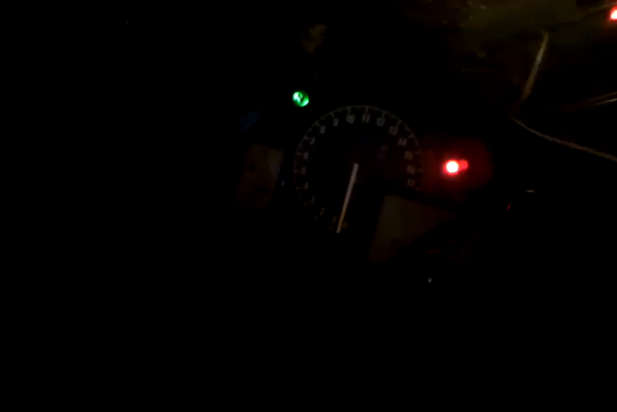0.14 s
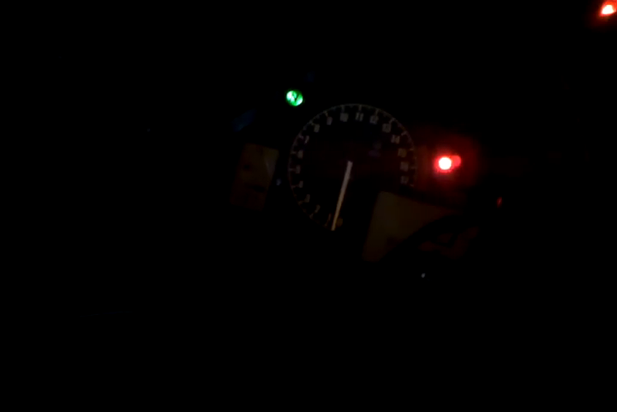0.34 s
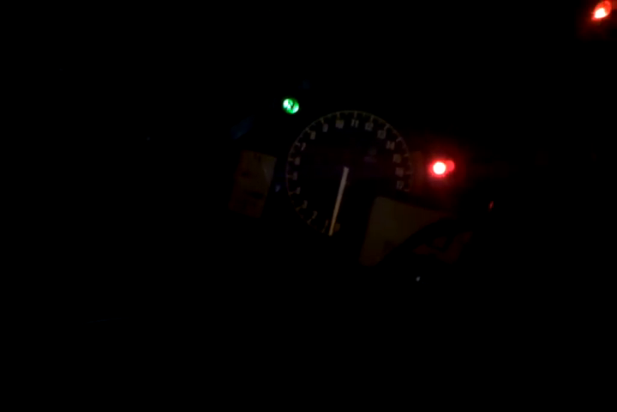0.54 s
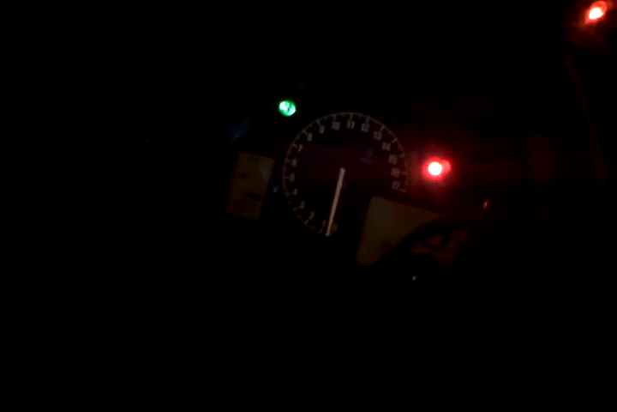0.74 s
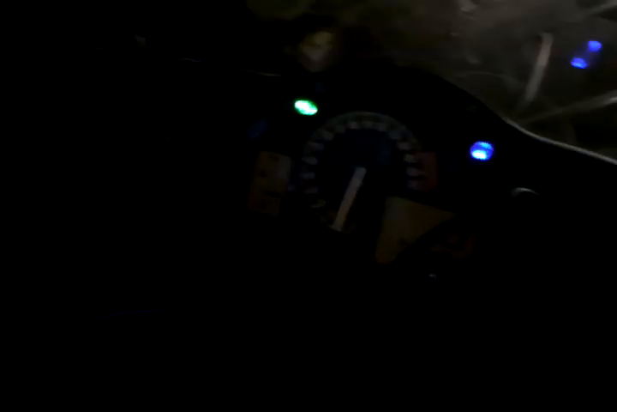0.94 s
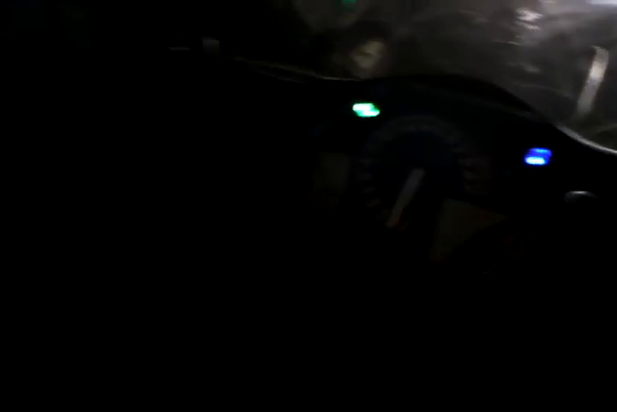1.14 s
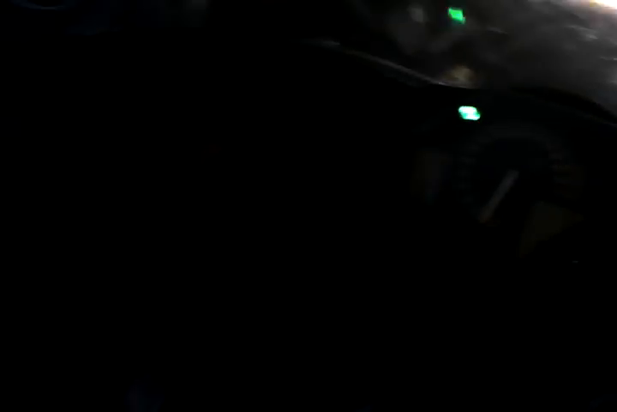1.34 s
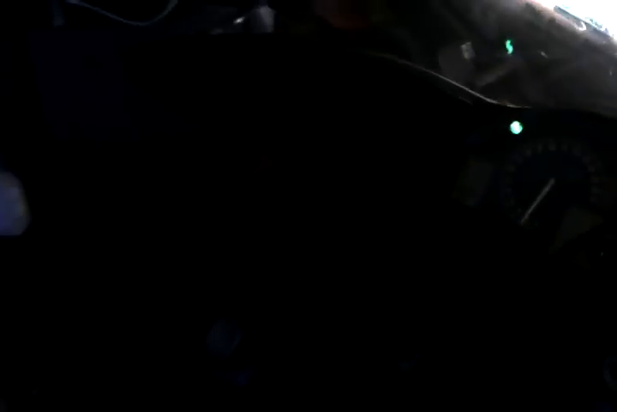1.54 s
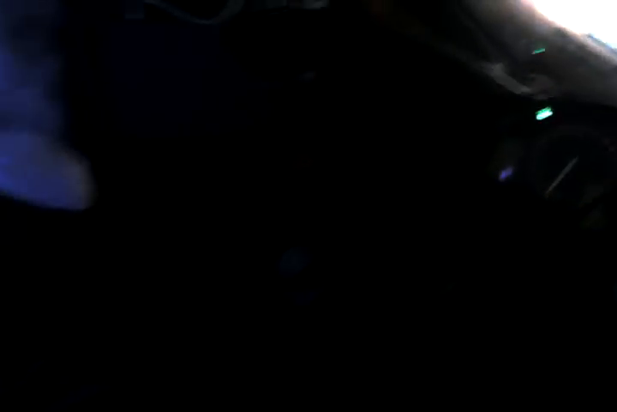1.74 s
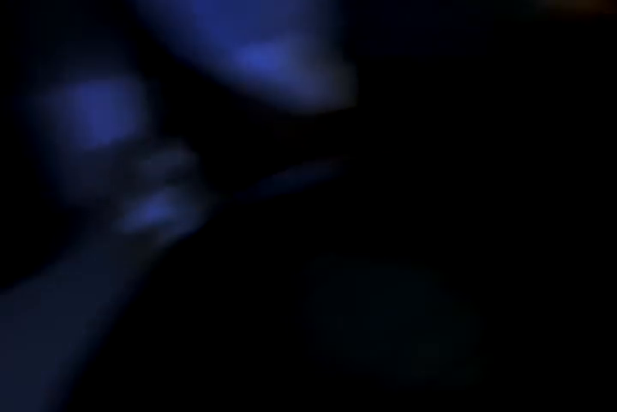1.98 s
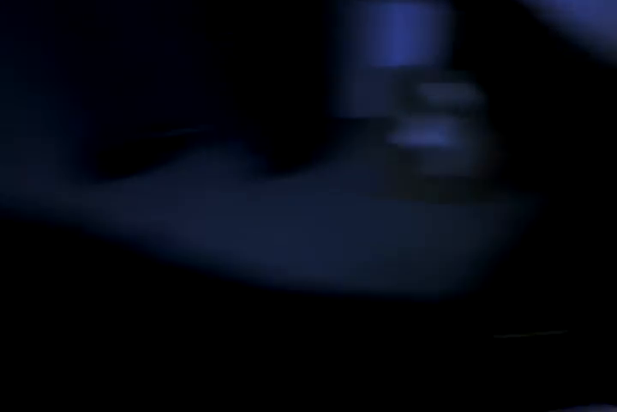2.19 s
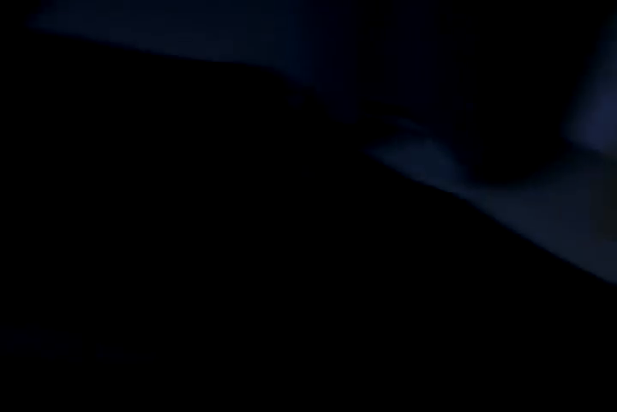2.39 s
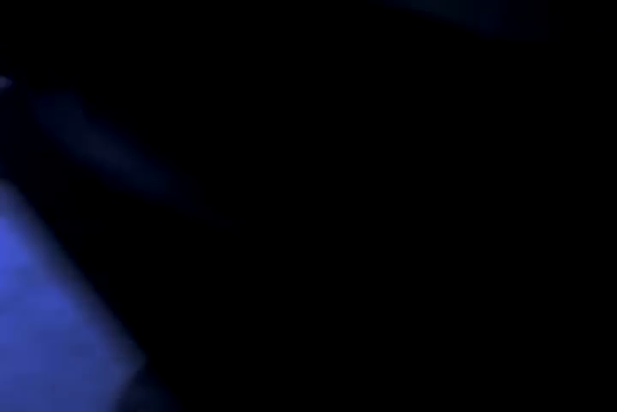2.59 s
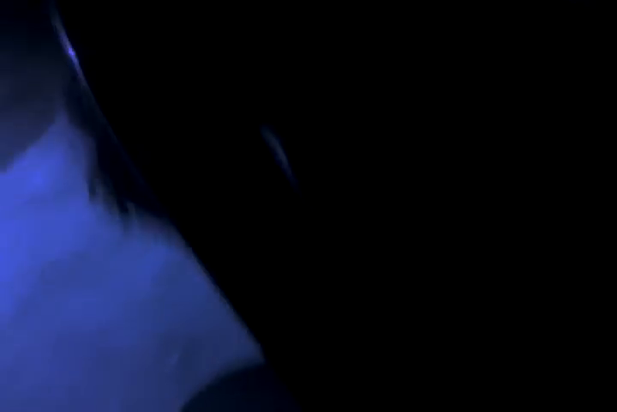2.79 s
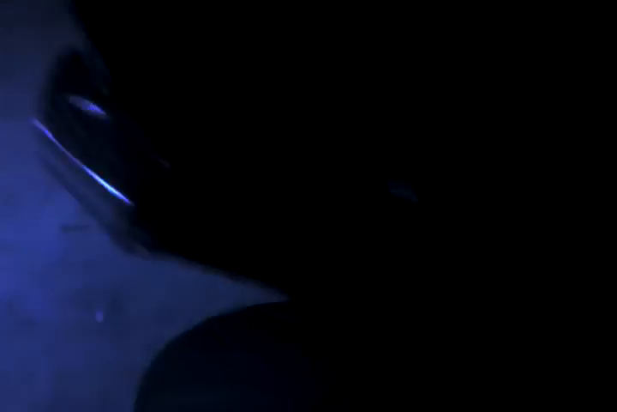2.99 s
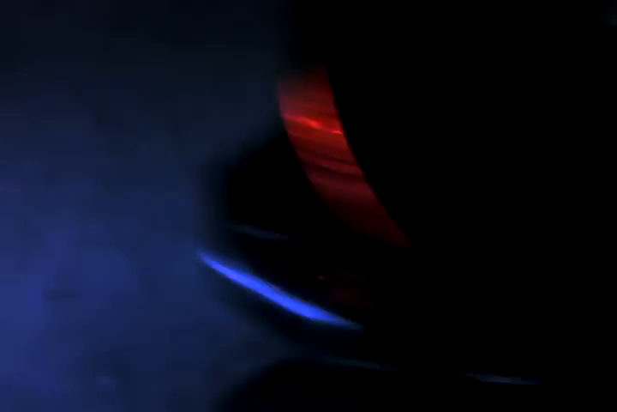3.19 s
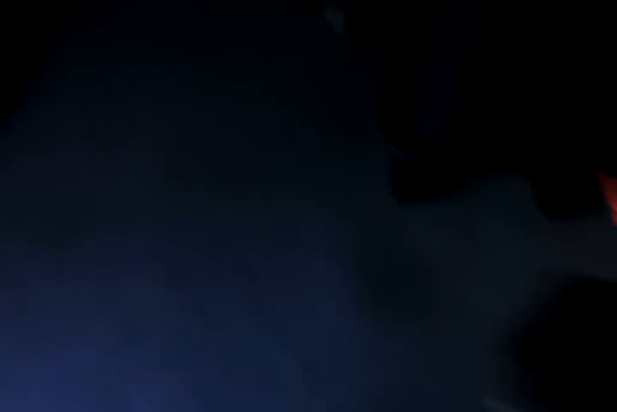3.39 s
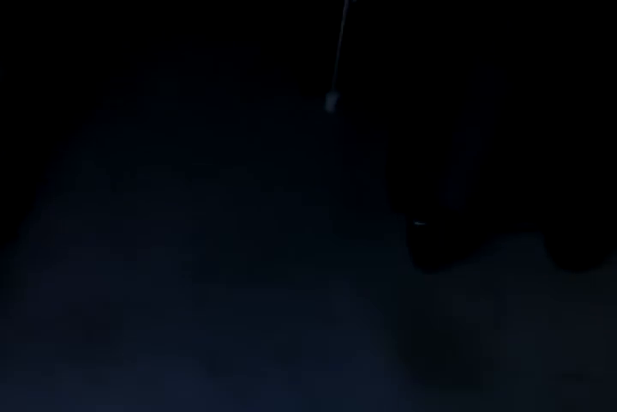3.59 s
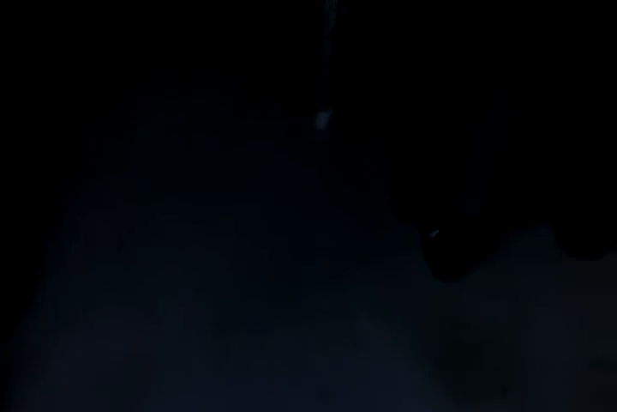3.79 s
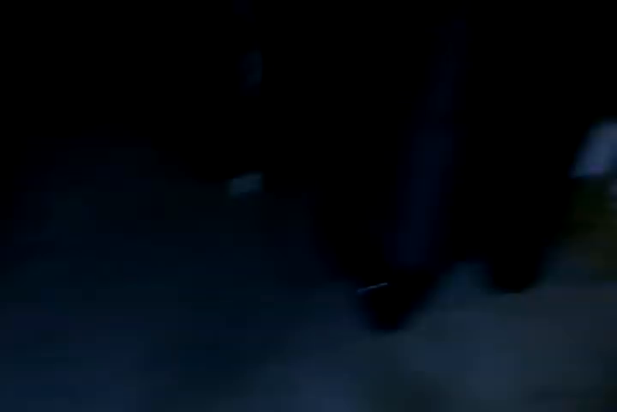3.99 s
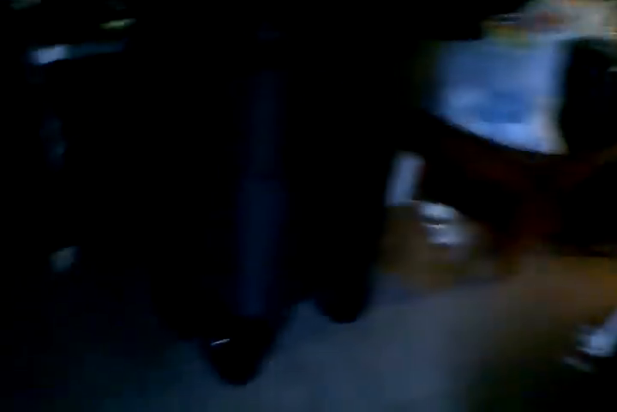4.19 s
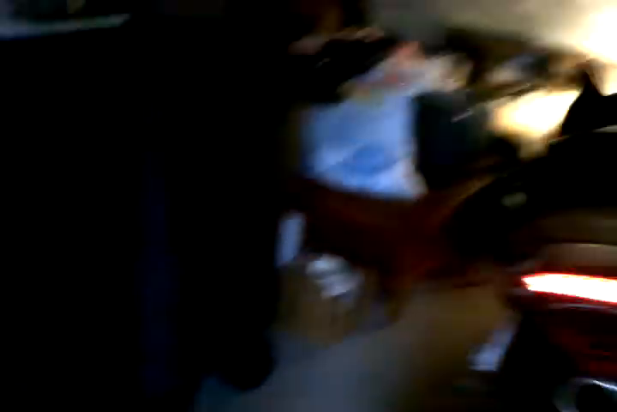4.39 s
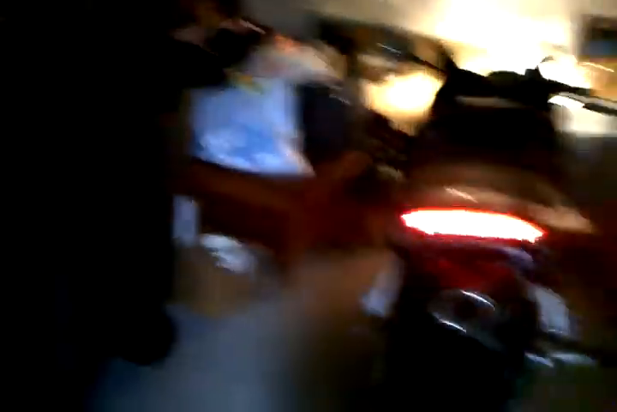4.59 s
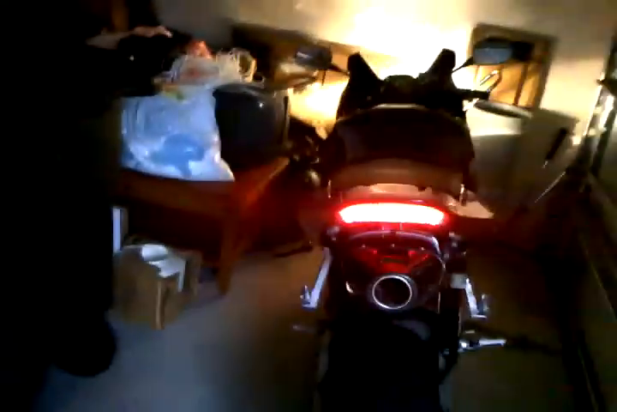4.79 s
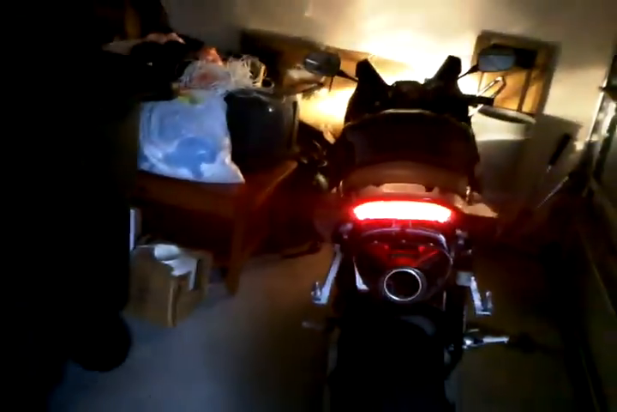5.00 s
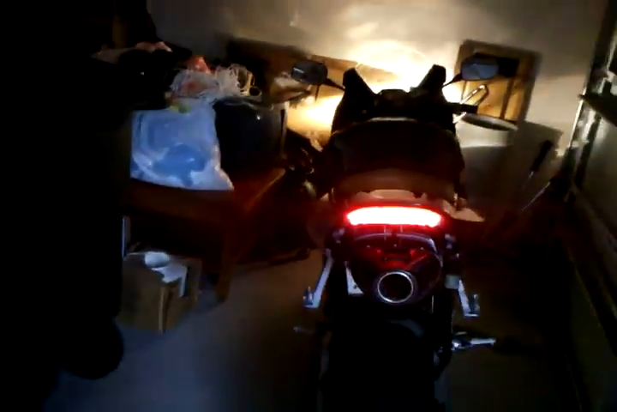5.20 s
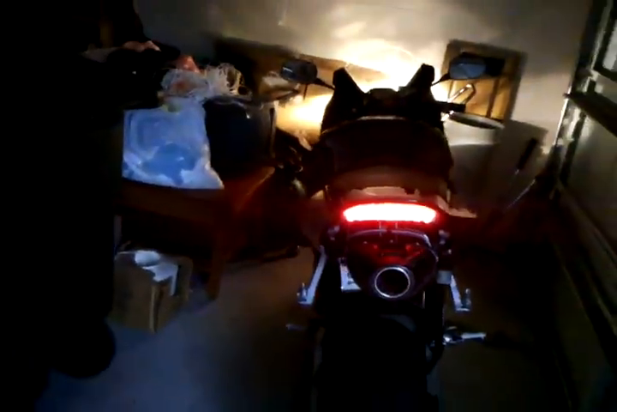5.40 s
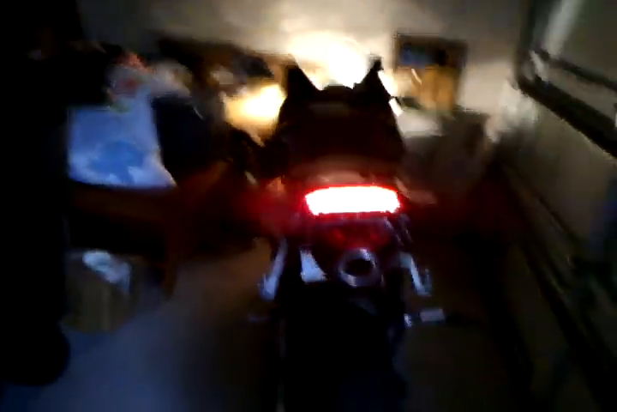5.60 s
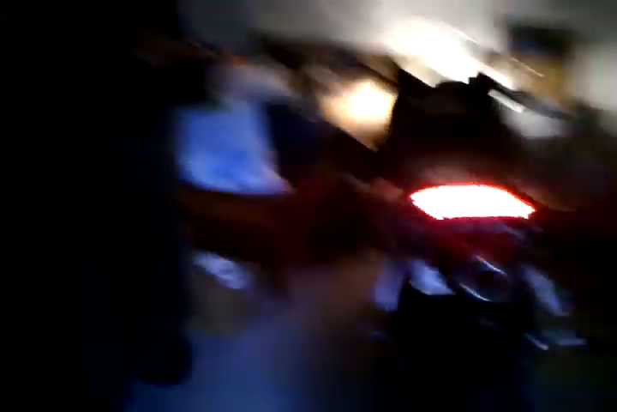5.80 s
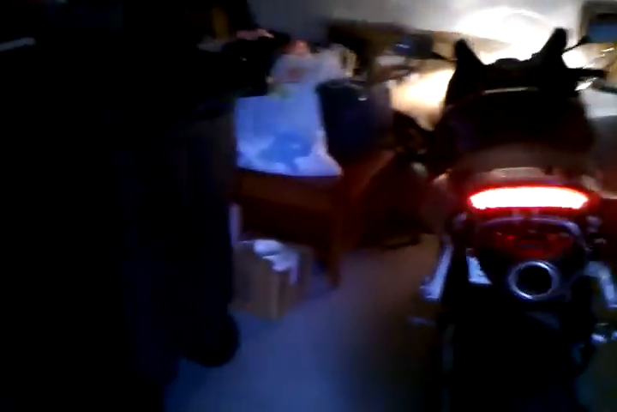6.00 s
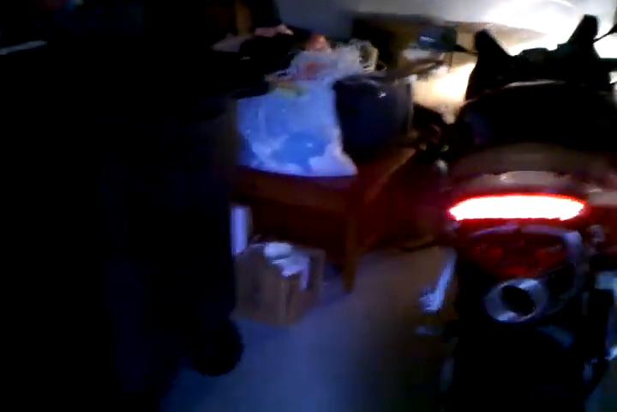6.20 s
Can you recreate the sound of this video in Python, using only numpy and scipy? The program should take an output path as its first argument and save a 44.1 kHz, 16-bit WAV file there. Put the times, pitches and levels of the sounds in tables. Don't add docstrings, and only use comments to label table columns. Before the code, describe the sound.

In a quiet garage a motorcycle's starter whines and labours, the engine catches and settles into a lumpy idle, booming loudest near the tailpipe.

```python
import sys
import numpy as np
from scipy import signal
from scipy.fft import rfft, irfft, next_fast_len
from scipy.io import wavfile
from scipy.ndimage import uniform_filter1d

SR = 44100
rng = np.random.default_rng(int(sys.argv[2]) if len(sys.argv) > 2 else 0)


def unload_audio(sound):
    columns = np.transpose(np.atleast_2d(sound))
    steps = np.round(np.clip(columns, -1, 1) * 32767)
    wavfile.write(sys.argv[1], SR, steps.astype(np.int16))


def amplitude_ratio(level_db):
    exponent = np.asarray(level_db, float) / 20
    return 10 ** exponent


N = 275625
ENGAGE_S = .3212
BLAST_LAG_S = .0062


def rms_one(x):
    return x / np.sqrt(np.mean(x ** 2) + 1e-20)


def in_time(rows):
    s, *columns = np.transpose(rows)
    return [np.interp(np.arange(N) / SR, s, c) for c in columns]


def drift(rate_hz):
    r = np.exp(-2 * np.pi * rate_hz / SR)
    wander = signal.lfilter([1], [1, -2 * r, r * r], rng.standard_normal(N + SR))
    return rms_one(wander[SR:])


def resonance(x, hz, width_hz):
    r = np.exp(-np.pi * width_hz / SR)
    return signal.lfilter([1 - r, 0, r - 1], [1, -2 * r * np.cos(2 * np.pi * hz / SR), r * r], x + 1e-18)


def noise_bands(spectrum, patchy_db, size=N):
    hz, level_db = np.transpose(spectrum)
    count = round(3 * np.log2(hz[-2] / hz[1]))
    edges = np.geomspace(hz[1], hz[-2], count + 1)
    centres = np.sqrt(edges[1:] * edges[:-1])
    white = rng.standard_normal((2, size))
    flicker = amplitude_ratio(patchy_db * drift(3.4))
    bands = np.zeros((len(centres), N))
    for k, centre in enumerate(centres):
        sos = signal.butter(2, edges[k:k + 2], "band", fs=SR, output="sos")
        band = signal.sosfilt(sos, white[k % 2])
        level = amplitude_ratio(np.interp(np.log(centre), np.log(hz), level_db))
        bands[k, :size] = level * np.roll(flicker, 19973 * k)[:size] * band
    return centres, bands / np.std(bands.sum(axis=0)[:size])


# f/Hz, width/Hz, level/dB
PUMP_TONES = [(1280, 40, -68.5), (1730, 65, -73)]


def fuel_pump():
    return sum(amplitude_ratio(db) * rms_one(resonance(rng.standard_normal(N), hz, width))
               for hz, width, db in PUMP_TONES)


# f/Hz, level/dB
QUIET_TONE = [(56, -29), (95, 1), (1090, -16), (1310, -7), (2260, -19), (6630, -14), (7400, -25),
              (9620, -55), (16300, -120)]


def quiet_garage():
    return amplitude_ratio(-58) * noise_bands(QUIET_TONE, patchy_db=-2.0, size=SR)[1].sum(axis=0)


# t/s, level/dB (peak)
SWITCH_TICKS = [
    (.205, -51),
    (0.307, -29),
    (.312, -27),
]


def switch():
    clicks = np.zeros(N)
    for s, db in SWITCH_TICKS:
        clicks[round(s * SR)] = amplitude_ratio(db + 12.5)
    return resonance(clicks, 2300, 900) - resonance(clicks, 3900, 800) + resonance(clicks, 5300, 980)


# t/s, f/Hz (gear teeth meeting), level/dB
STARTER_SPEED = [
    (.36, 1500, -27),
    (.4, 1760, -25),
    (.46, 1790, -25),
    (.495, 1620, -25),
    (.53, 1300, -30),
    (.59, 1160, -28),
    (.64, 1290, -25),
    (.75, 1325, -24.5),
    (.93, 1320, -24),
]
# t/s, half length/s, swell level/dB, pitch sag/0-1
COMPRESSIONS = [
    (0.468, 0.018, 1.5, 0),
    (0.585, 0.039, 8, 0.07),
    (0.673, 0.028, 7.5, 0.05),
    (0.749, 0.031, 8.5, 0.03),
    (0.833, .035, 7, .035),
]
# t/s, blur/0-1
GEAR_BLUR = [
    (.36, .85),
    (.46, .78),
    (.5, .92),
    (.62, .9),
    (.66, .72),
    (.93, .72),
]
# multiple, level running light/dB, level loaded/dB
TOOTH_TONES = [(.5, -3, -26), (1, 3.5, -7.5), (1.5, -2, -22), (2, -1, -3), (2.5, -5.5, -12.5),
               (3, -5.5, -7.5), (4, -15, -5.5), (5, -18, -10)]
# f/Hz, level/dB (per Hz)
GRIND_TONE = [(240, -47), (400, -16), (688, -1), (1050, -10.5), (1350, -0.5), (1550, -5), (2600, -4),
              (6640, -5.5), (7600, 9), (9880, -42), (16700, -120)]


def starter():
    mesh_hz, effort_db = in_time(STARTER_SPEED)
    t, blur = np.arange(N) / SR, in_time(GEAR_BLUR)[0]
    load_db, sag = np.zeros(N), np.zeros(N)
    for s, half, swell_db, share in COMPRESSIONS:
        near = np.clip((t - s) / half, -1.5, 1.5)
        load_db += swell_db * np.exp(-near ** 4) * (abs(near) < 1.5)
        sag += share * np.sin(near * np.pi / 1.5)
    turn = 2 * np.pi * np.cumsum(mesh_hz * (1 - sag)) / SR
    loaded = np.clip((t - 0.562) / 0.1 + .5, 0, 1)
    whine = np.zeros(N)
    for k, light_db, loaded_db in TOOTH_TONES:
        db = effort_db + light_db + (loaded_db - light_db) * loaded
        wobble = drift(50 + 50 * k) * np.sin(k * turn) + drift(50 + 50 * k) * np.cos(k * turn)
        whine += amplitude_ratio(db) * (np.sqrt(2 - 2 * blur) * np.sin(k * turn) + np.sqrt(blur) * wobble)
    whine *= np.clip((t - .35) / 0.11, 0, 1)
    clash = amplitude_ratio(-36.5) * np.exp(-np.maximum(t - ENGAGE_S, 0) / 0.023)
    grind = amplitude_ratio(effort_db + 0.5) * amplitude_ratio(.7 * load_db) + clash
    grit = noise_bands(GRIND_TONE, patchy_db=0.0, size=SR)[1].sum(axis=0)
    sound = whine * amplitude_ratio(load_db - 1) + grind * grit
    return sound * (t > ENGAGE_S) * np.clip((.94 - t) / 0.079, 0, 1)


# t/s, level/dB
PUFFS = [
    (.32, -38.5),
    (.37, -34),
    (.5, -47),
    (.6, -33),
    (.8, -37),
    (.92, -27.5),
    (1.0, -42.5),
]


def cranking_puffs():
    t = np.arange(N) / SR
    low = resonance(rng.standard_normal(N), 190, 76)
    high = resonance(rng.standard_normal(N), 280, 120)
    return amplitude_ratio(in_time(PUFFS)[0]) * (t > ENGAGE_S) * rms_one(low + 0.17 * high)


# t/s, firings/s
IDLE_SPEED = [
    (.8, 35.5),
    (1.35, 35.3),
    (1.5, 38.5),
    (2.2, 39),
    (6.3, 39.6),
]
# t/s, level change of that blow/dB, of the next blow/dB,
# sag of speed after it/0-1
STUMBLES = [(.817, -7, -8, 0), (0.959, -8.5, 3, 0), (1.157, -19.5, -9.5, .03), (1.299, -6.5, 2, 0.01),
            (1.566, -7.5, 6.5, 0.04), (1.774, -11.5, -4.5, .05), (1.975, 4, -4.5, 0.05), (2.185, -5, -7, 0),
            (2.412, -5.7, 1.5, 0.05), (2.514, 0, -2.5, 0.05), (2.615, -6, -2, .05), (2.741, -2, -0.5, 0.03),
            (3.069, -8.5, 0, 0), (3.131, -2, 0.5, .12), (3.297, -15.5, 0.5, .05),
            (3.474, -11.5, -1.5, .045), (3.677, 0, -2, .05), (3.883, -9, -2, 0.06),
            (4.085, -12, -22.5, .07), (4.286, -20, -21, 0), (4.359, -8.7, -1, 0.07),
            (4.484, -4.5, -1, 0.01), (4.687, 1, -0.5, 0.05), (4.885, -4, -0.5, 0.05), (5.118, -2, -3, 0.07),
            (5.324, -4, -0.5, .05), (5.523, -1.5, -2, 0.02), (5.721, -5.5, -2.5, .05),
            (5.902, -4.5, 1, 0.03), (6.122, -5, 0, .05)]


def crank():
    s, *_, sag = np.transpose(STUMBLES)
    s = np.append(s - BLAST_LAG_S, s[-1] + .195)
    idling = np.diff(s) * np.interp(s[1:] - np.diff(s) / 2, *np.transpose(IDLE_SPEED))
    counts = np.round(idling)
    laps = np.interp(np.arange(N) / SR, s, np.arange(len(s)))
    lap = laps.astype(int)
    sag = sag[lap]
    slowest = .22
    angle = 2 * np.pi * (laps - lap - slowest)
    share = laps - lap - sag / (2 * np.pi) * (np.sin(angle) + np.sin(2 * np.pi * slowest))
    fired = (np.cumsum(counts) - counts)[lap] + counts[lap] * share
    fast = 100 * ((counts / idling)[lap] * (1 - sag * np.cos(angle)) - 1)
    return np.where(laps > 0, fired, -.5), fast


def blast(blows, peak_db):
    blast_hz, length_s, lean_rad = 225, .0015, .3
    t = np.arange(2 * round(BLAST_LAG_S * SR)) / SR - BLAST_LAG_S
    shape = -np.cos(2 * np.pi * blast_hz * t - lean_rad) * np.exp(-.5 * (t / length_s) ** 2)
    return amplitude_ratio(peak_db) * signal.fftconvolve(blows, shape)[:N]


# t/s, roughness/0-1
ROUGHNESS = [
    (.8, .6),
    (1.4, .5),
    (2.1, .3),
    (2.25, .06),
    (3.2, .07),
    (6.25, .07),
]
CYLINDERS_DB = [-2.1, -0.43, 0.082, -0.14]
# t/s, exhaust level/dB, place in the garage boom/-1..1, tailpipe blow peak level/dB
WALK = [(.75, -65, 0.94, -14), (.93, -29, -0.067, -33), (1.02, -22, 0.099, -22), (1.5, -26, -0.16, -15.5),
        (2.1, -20.5, 0, -20), (2.3, -17, 0.29, -16), (2.6, -19, 0.39, -10), (2.9, -18.5, 0.69, -11.5),
        (3.1, -14.5, -0.067, -18), (3.2, -17, .2, -4), (3.6, -14, 0.2, -2), (3.9, -16, 0.11, -3),
        (4.1, -21, 0, -4.5), (4.4, -21, 0.045, -4.5), (4.65, -20.5, 0.12, -8.5), (5.0, -21, -0.024, -10.5),
        (5.6, -23, -0.19, -13), (6.25, -21, -0.11, -13.5)]
# f/Hz, width/Hz, level/dB
PIPE_MODES = [
    [(82.4, 88, -34.5), (120, 87, 4.5)],
    [(148.8, 61, 12.5)],
    [(195.5, 37, 2), (224.7, 88, 6.5), (243.6, 32, 4)],
    [(256, 160, 5), (322, 58, 13), (413, 250, -31.5)],
]
# offset level/dB, dB per unit of boom, dB per 1% of speed
PIPE_LAW = [(-18, -12.5, 0.5), (0.5, 12, 0.23), (2, -11, 0.68), (-16, 3, 4)]


def exhaust(fired, fast):
    at = np.flatnonzero(np.diff(np.floor(fired)))
    rough, chance = in_time(ROUGHNESS)[0], rng.standard_normal((len(at) + 1, 2))[1:]
    strength_db = np.resize(CYLINDERS_DB, len(at)) + 3.5 * rough[at] * chance[:, 0]
    for s, first_db, next_db, _ in STUMBLES:
        k = np.argmin(abs(at - (s - BLAST_LAG_S) * SR))
        strength_db[k:k + 2] += first_db, next_db
    blows = np.zeros(N)
    late = (.002 * SR * rough[at] * chance[:, 1]).astype(int)
    blows[np.clip(at + late, 0, N - 1)] = amplitude_ratio(strength_db)
    gust = signal.lfilter([1], [1, -np.exp(-1 / (0.068 * SR))], blows)
    drive = blows + .05 * rough * gust * rng.standard_normal(N)
    level_db, boom, blast_db = in_time(WALK)
    lag = round(0.01286 * SR)
    drive[lag:] += amplitude_ratio(-7 + 5 * boom[lag:]) * drive[:-lag].copy()
    muffler = signal.butter(4, [80, 370], "band", fs=SR, output="sos")
    drive = signal.sosfilt(muffler, drive)
    out = blast(blows, blast_db)
    limit = 2.6
    fast = limit * np.tanh(uniform_filter1d(fast, size=SR // 30) / limit)
    for modes, (offset_db, boom_db, speed_db) in zip(PIPE_MODES, PIPE_LAW):
        ring = sum(amplitude_ratio(db) * rms_one(resonance(resonance(drive, hz, width), hz, width))
                   for hz, width, db in modes)
        gain = amplitude_ratio(level_db + offset_db + boom_db * boom + speed_db * fast)
        out -= gain * ring / np.sqrt(abs(uniform_filter1d(ring ** 2, size=SR // 4)) + .01)
    return out


# t/s, level/dB, turned away from the engine/-.3..1
CLATTER_LEVEL = [(.9, -33, -.3), (.96, -30, 0), (1.94, -33, 0.15), (2.04, -34.5, 0.34), (2.53, -34, 0.44),
                 (3.0, -34, 0.23), (3.4, -33.5, .5), (3.72, -35, .8), (3.86, -35.5, 0.3), (4.1, -35, .5),
                 (4.38, -34.5, 0.19), (4.8, -35.5, 0.65), (5.91, -36, 0.41), (6.09, -38.5, 0.96),
                 (6.25, -37, 0.97)]
# f/Hz, level/dB (per Hz)
CLATTER_TONE = [(250, -30), (420, -10), (492, -2), (828, -8), (1080, -7.5), (1360, -7.5), (1820, -7),
                (2240, -16), (2650, -11), (3220, -16.5), (5100, -9.5), (6730, -3.5), (7600, -12),
                (9880, -60.5), (16700, -120)]
# f/Hz, width/Hz, level/dB
CASINGS = [(1148, 150, -12), (1820, 310, -14.5), (4340, 58, -15), (4970, 110, -13), (6200, 190, -30)]
# offset level/dB, level change when turned away/dB
CLATTER_LAW = [(-2.5, 3.5), (-1, 1), (4.5, -15.5)]


def clatter(fired):
    centres, bands = noise_bands(CLATTER_TONE, patchy_db=1.57)
    edges_hz = [(0, 2200), (2200, 5400), (5400, SR)]
    beat_db = 0.8 * np.cos(2 * np.pi * (fired - .2)) + 0.33 * np.cos(4 * np.pi * (fired - .2))
    out, taps = np.zeros(N), rng.standard_normal(N)
    level_db, away = in_time(CLATTER_LEVEL)
    for (low, high), (offset_db, away_db) in zip(edges_hz, CLATTER_LAW):
        group = rms_one(bands[(centres > low) & (centres <= high)].sum(axis=0))
        rings = [amplitude_ratio(db + 2 * drift(6.0)) * rms_one(resonance(taps, hz, width))
                 for hz, width, db in CASINGS if low < hz <= high]
        out += amplitude_ratio(level_db + offset_db + away_db * away) * (group + sum(rings))
    fade_in = np.clip((np.arange(N) / SR - .82) / 0.1, 0, 1)
    return fade_in * amplitude_ratio(beat_db) * out


def scene():
    fired, fast = crank()
    before = fuel_pump() + quiet_garage() + switch()
    cranking = starter() + cranking_puffs()
    return (before + cranking + exhaust(fired, fast) + clatter(fired))[None]


# f/Hz, level/dB
CONVERTER_EDGE = [(6850, 0), (7650, -26), (8300, -28), (9200, -24), (9300, -90)]


def converter(x):
    size = next_fast_len(N + SR // 10)
    hz = np.arange(size // 2 + 1) * SR / size
    gain = amplitude_ratio(np.interp(hz, *np.transpose(CONVERTER_EDGE)))
    return irfft(rfft(x, size) * gain, size)[:, :N]


def roll_off(x):
    return signal.sosfilt(signal.butter(12, 15800, fs=SR, output="sos"), x)


def record(dry):
    x = signal.sosfilt(signal.butter(3, 75, "high", fs=SR, output="sos"), dry)
    x = converter(np.clip(x, -.7, .7))
    mix = np.clip(x, -.701, .701)
    return roll_off(mix)


dry = scene()
out = record(dry)
unload_audio(out)
```